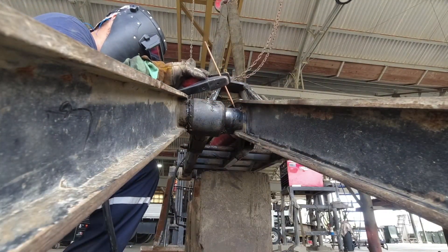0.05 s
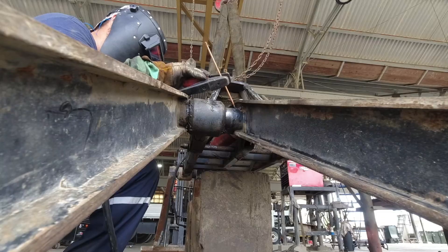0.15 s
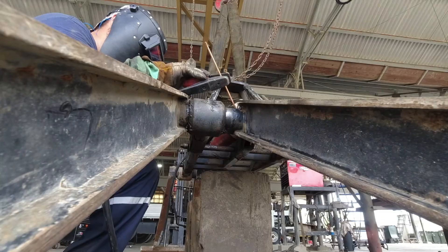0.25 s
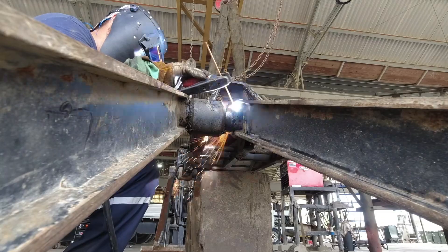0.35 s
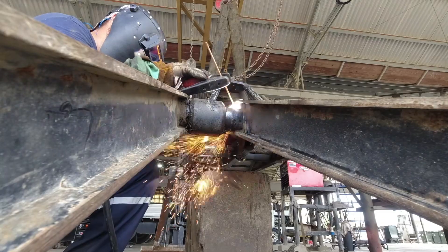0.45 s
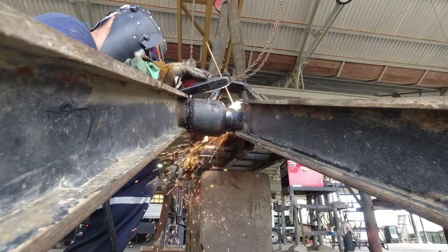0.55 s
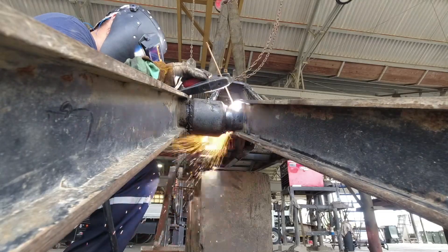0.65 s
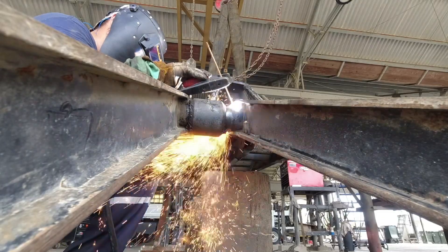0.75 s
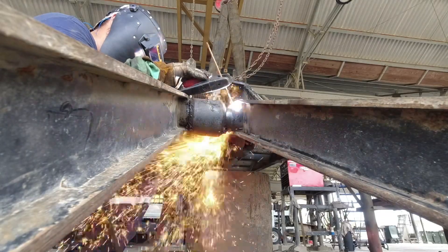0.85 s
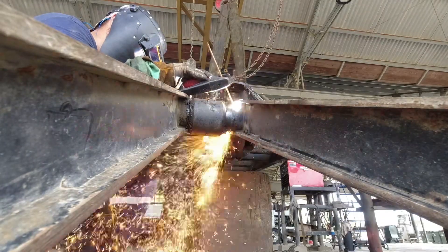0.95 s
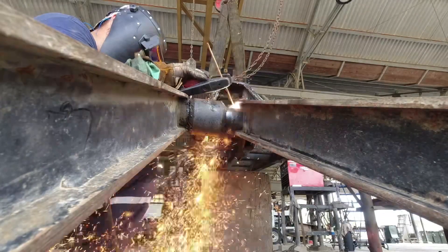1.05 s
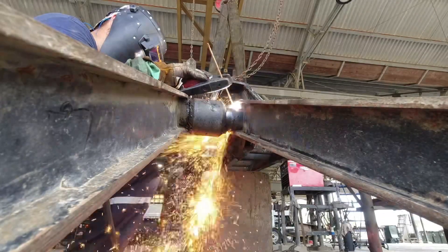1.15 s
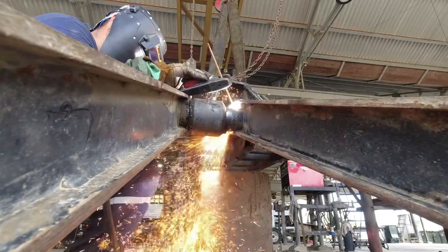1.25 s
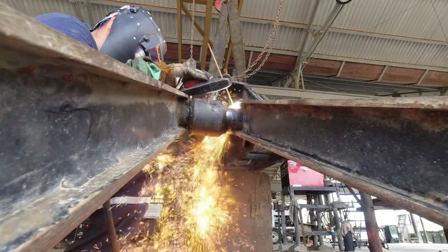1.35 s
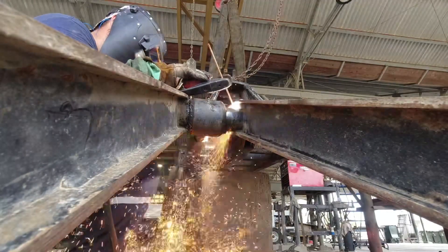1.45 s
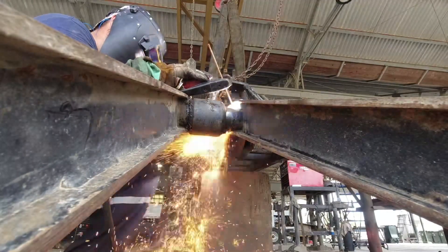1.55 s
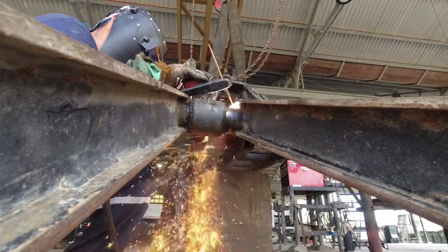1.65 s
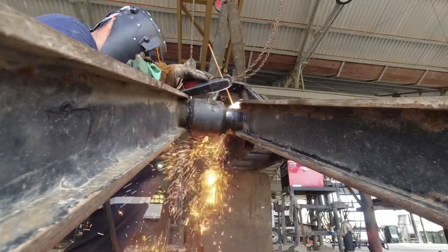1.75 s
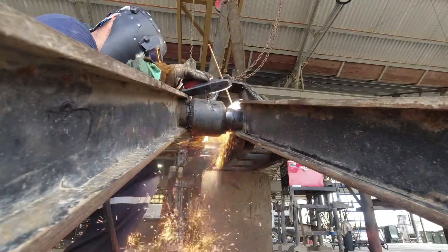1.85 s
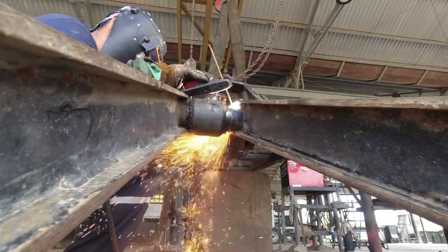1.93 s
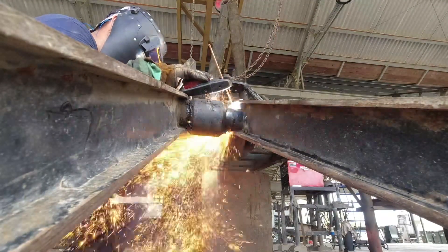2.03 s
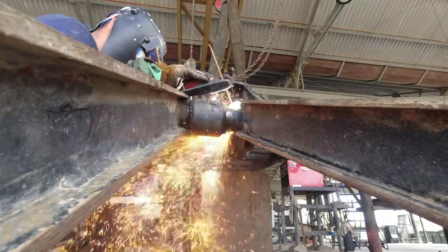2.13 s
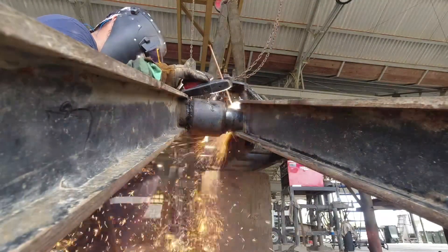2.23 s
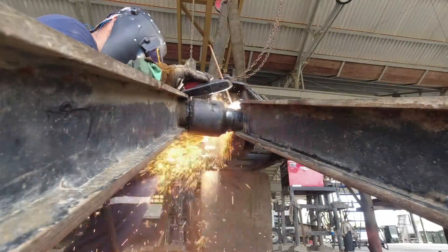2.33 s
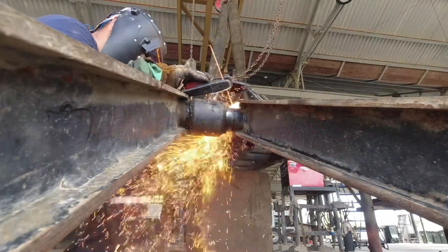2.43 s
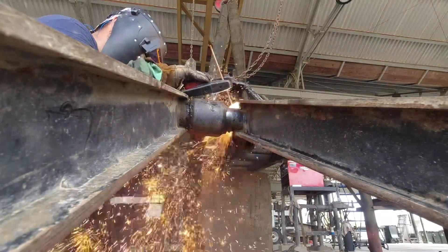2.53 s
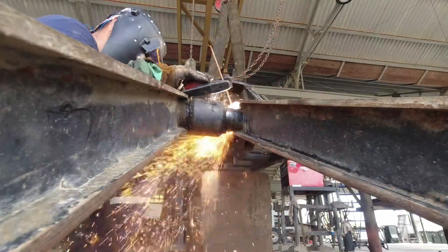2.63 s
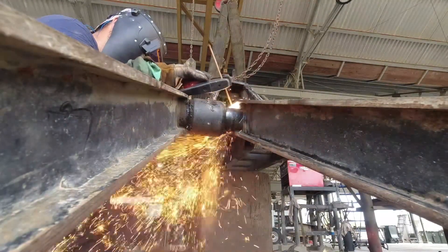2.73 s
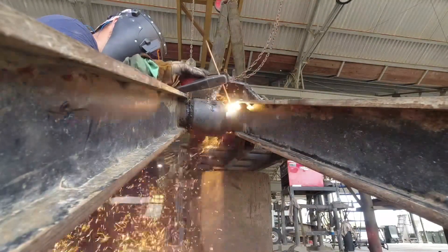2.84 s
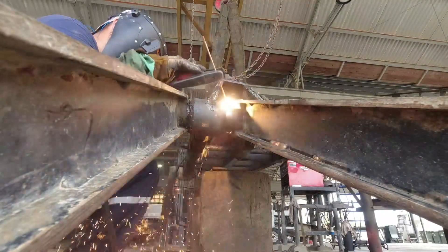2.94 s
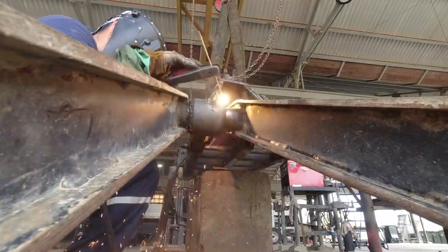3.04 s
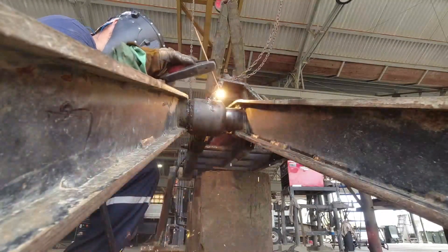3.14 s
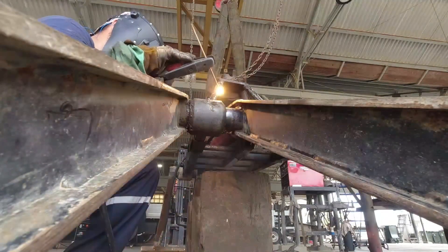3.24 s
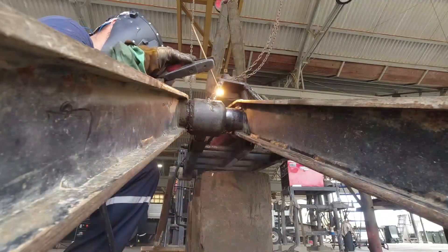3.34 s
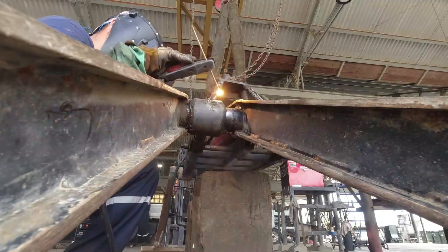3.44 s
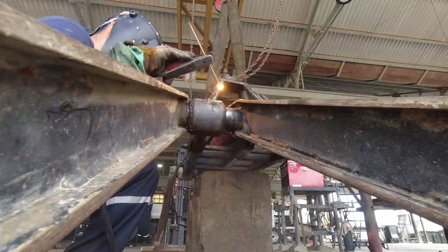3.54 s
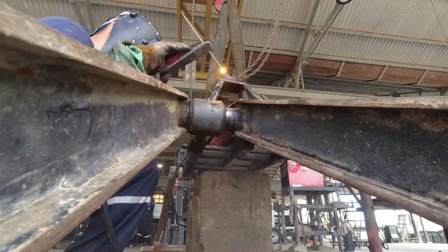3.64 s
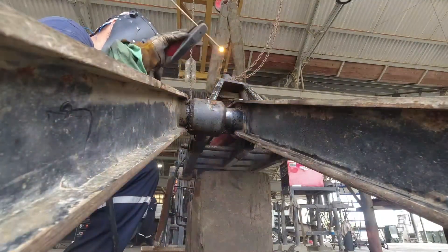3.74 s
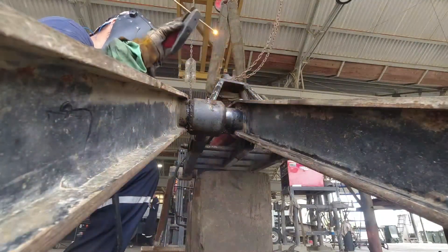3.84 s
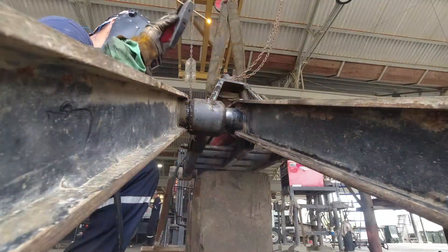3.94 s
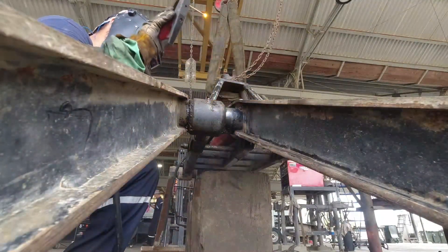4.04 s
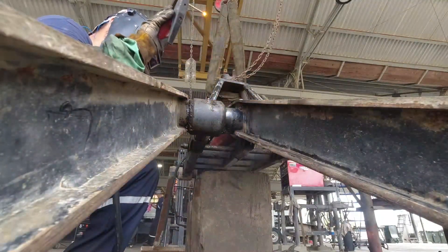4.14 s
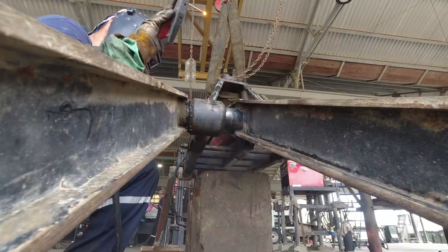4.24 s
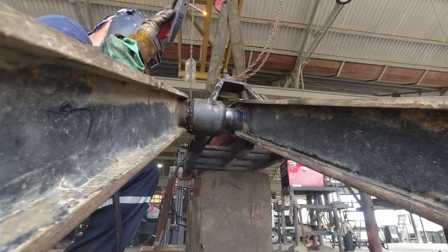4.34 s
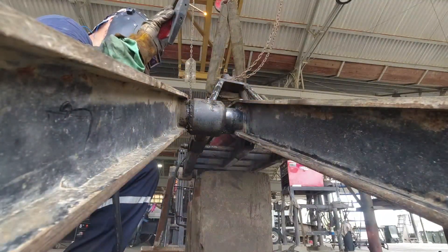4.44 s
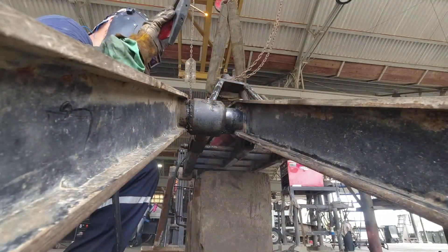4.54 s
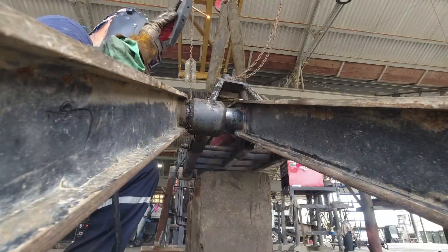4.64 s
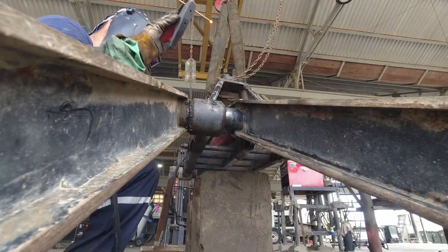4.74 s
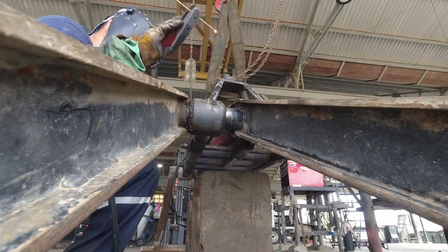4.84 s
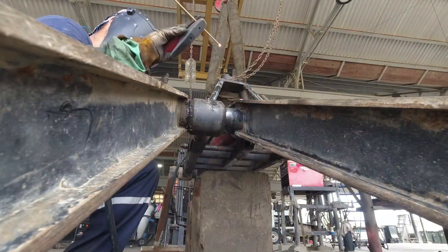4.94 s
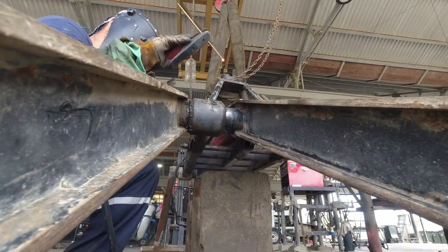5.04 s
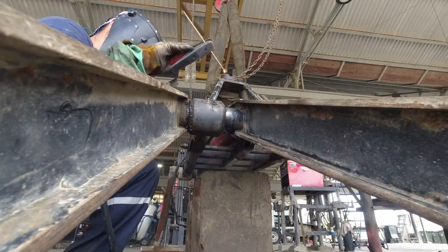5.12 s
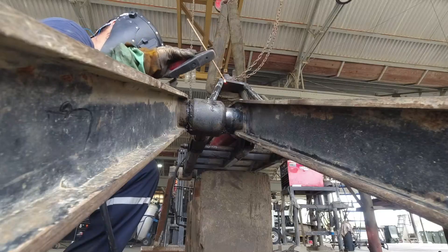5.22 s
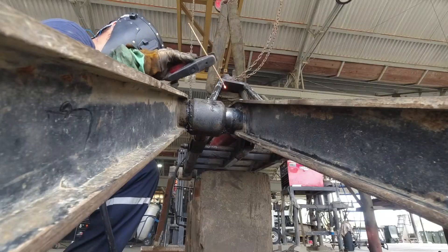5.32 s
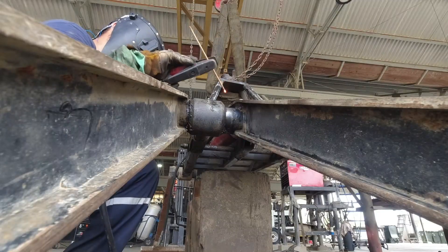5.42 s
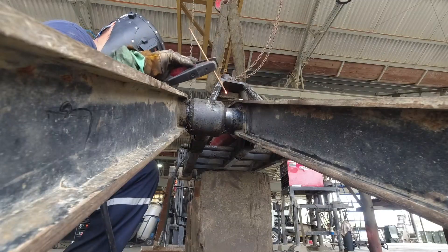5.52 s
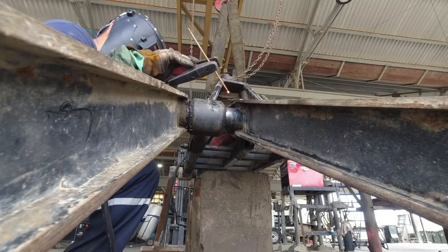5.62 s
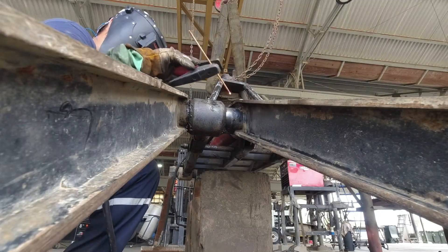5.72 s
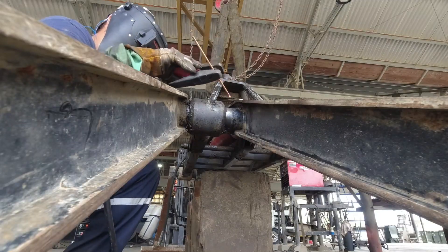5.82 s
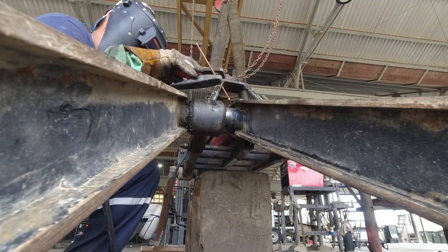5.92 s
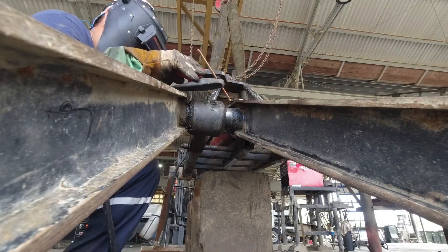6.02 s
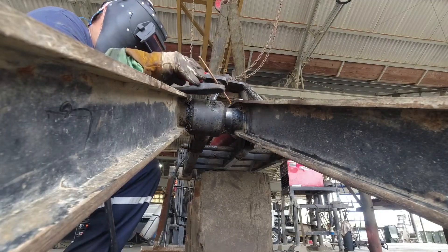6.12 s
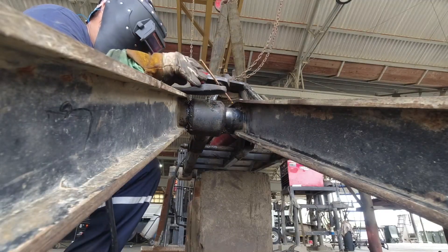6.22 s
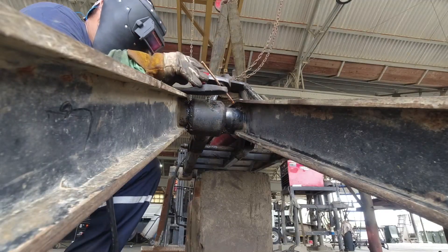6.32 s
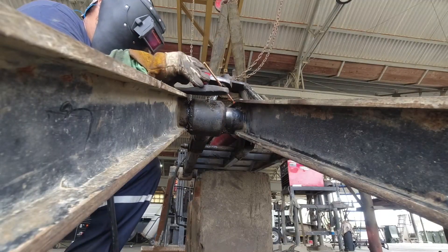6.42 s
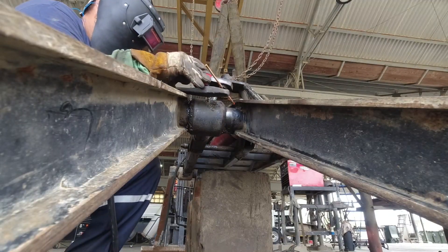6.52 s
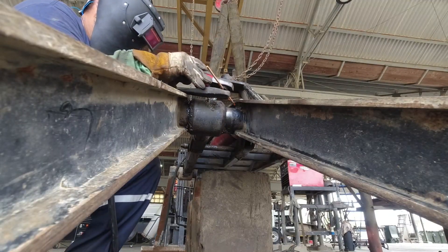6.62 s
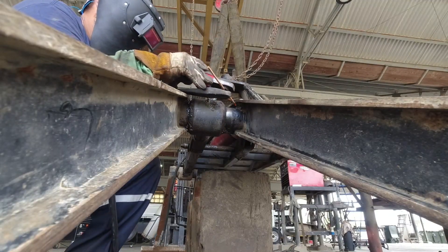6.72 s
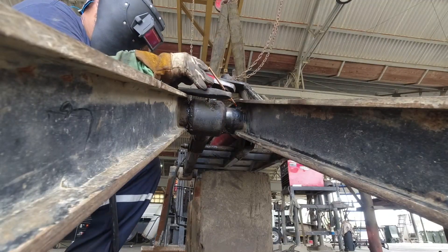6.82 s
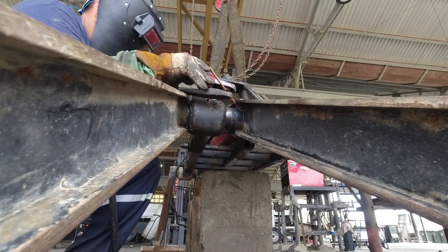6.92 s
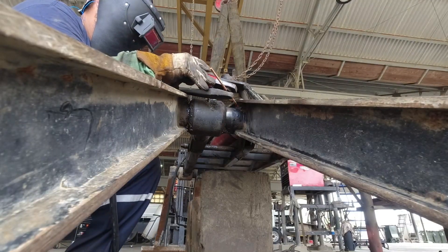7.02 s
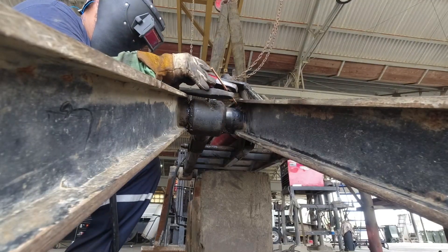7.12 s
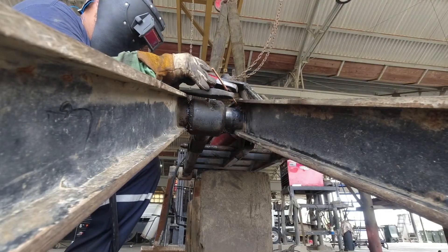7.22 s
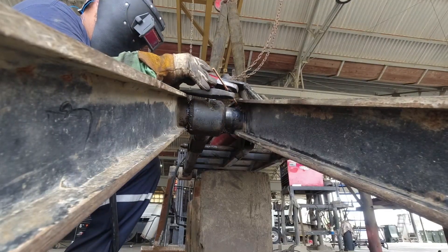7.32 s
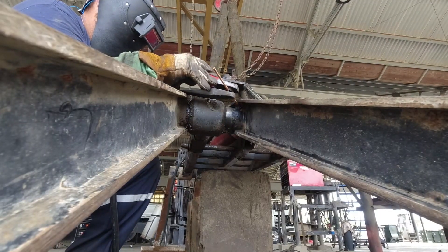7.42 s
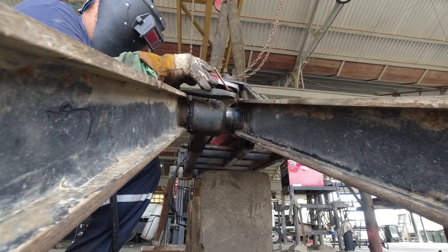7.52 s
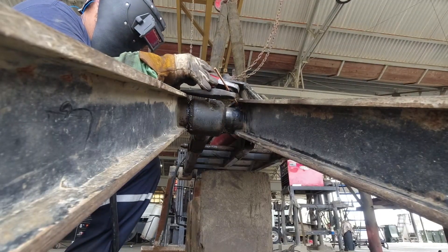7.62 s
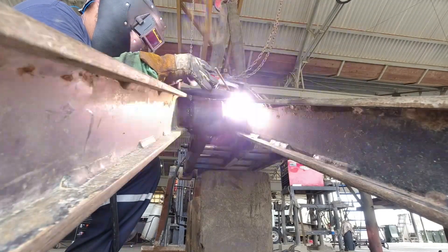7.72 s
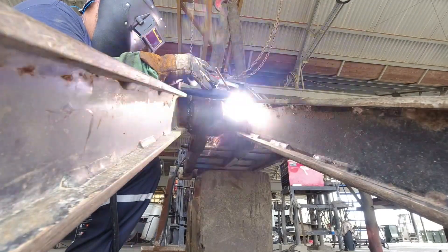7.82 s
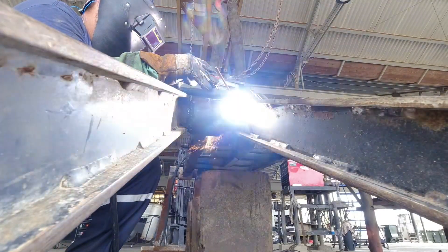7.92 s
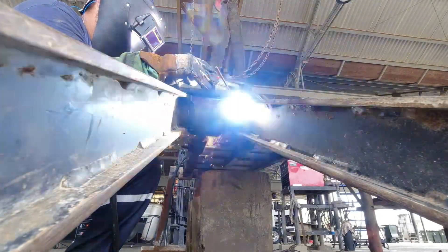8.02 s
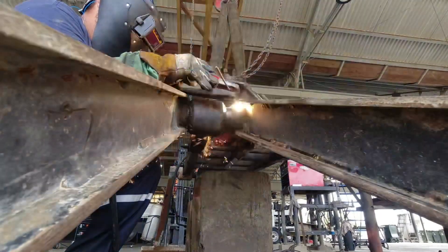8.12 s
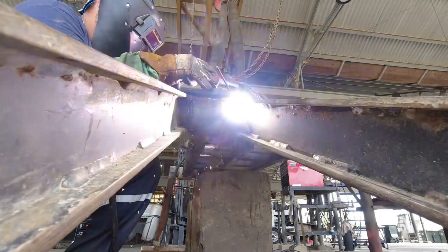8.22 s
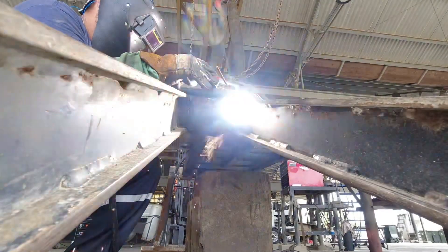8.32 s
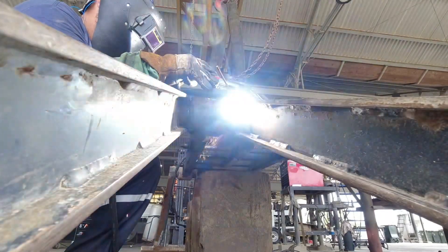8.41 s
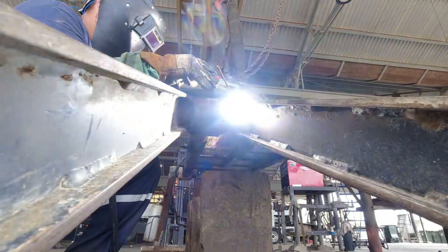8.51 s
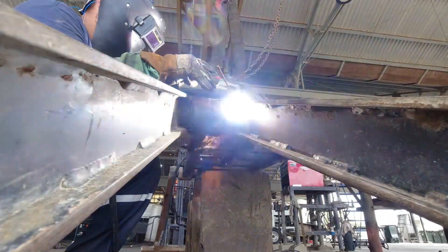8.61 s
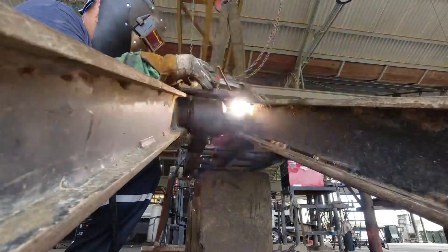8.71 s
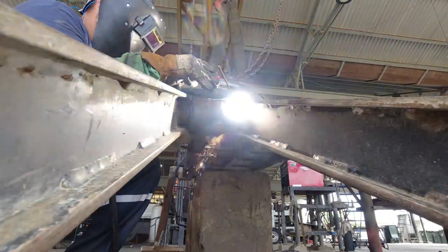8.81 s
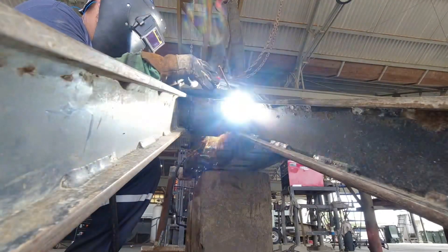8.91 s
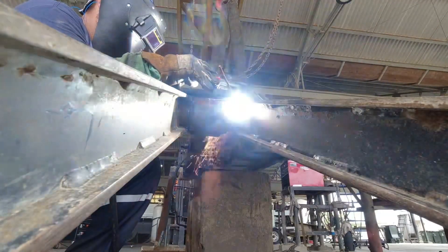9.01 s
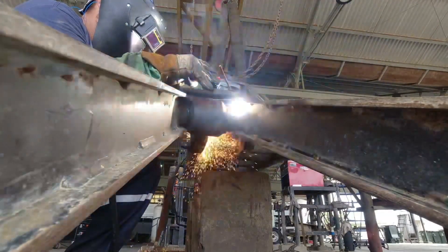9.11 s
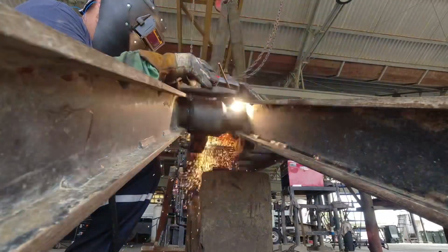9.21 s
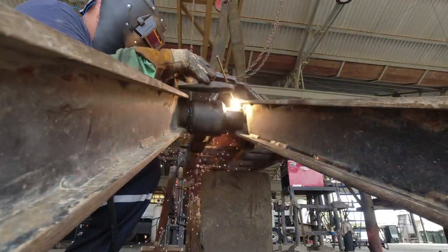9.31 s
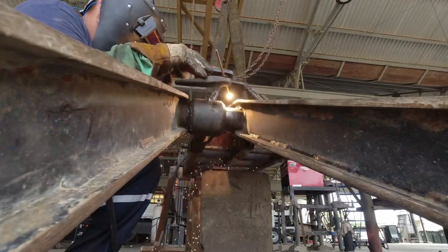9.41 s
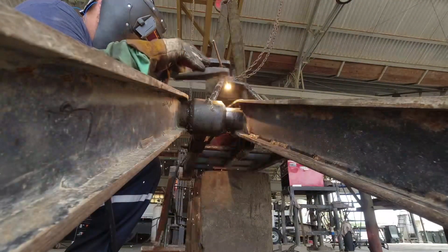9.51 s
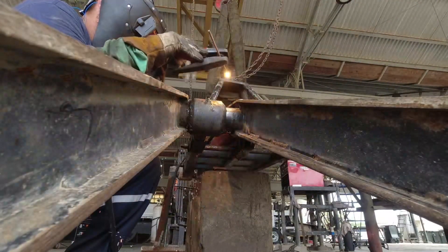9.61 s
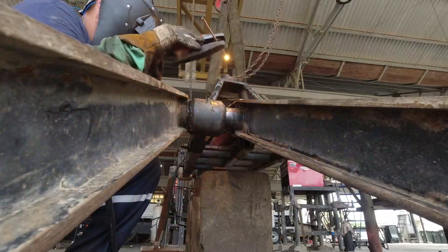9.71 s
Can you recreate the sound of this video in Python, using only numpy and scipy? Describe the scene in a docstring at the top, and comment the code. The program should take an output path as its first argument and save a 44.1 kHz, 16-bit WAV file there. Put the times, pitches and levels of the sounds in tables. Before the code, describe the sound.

Whistling air roars over a steel joint, an arc sizzles and spurts molten metal, the torch lifts to soft hissing, then a louder second cut.

```python
"""A whistling roar of compressed air on steel opens the scene; a carbon arc then gouges a joint in a workshop.
There are two cuts, with the torch lifted in between. Filtered noise makes the air: it hisses throughout,
and on the steel it roars and rings the hollow of the groove. Bursts of noise and random pops make the
sizzling arc, the spurting metal and single sharp cracks. Narrow noise bands whistle as the jet meets edges;
a far drone, thumps of air and a decaying noise tail complete the hall."""
import sys
import numpy as np
from scipy import signal
from scipy.fft import rfft, irfft
from scipy.io import wavfile

SR = 44100
rng = np.random.default_rng(int(sys.argv[2]) if len(sys.argv) > 2 else 0)


def digitize_waveform(pressure):
    """Quantize a signal to 16-bit integers and store it at the path in sys.argv[1].

    Rows of a 2-D input are taken as channels; values are limited to [-1, 1].
    """
    field = np.atleast_2d(pressure).T
    bounded = np.clip(field, -1, 1)
    quanta = np.round(bounded * 32767).astype(np.int16)
    wavfile.write(sys.argv[1], SR, quanta)


N = 430416
TIME = np.arange(N) / SR
# STFT grid: bin frequencies/Hz (column) and frame times/s
FREQ = np.maximum(np.fft.rfftfreq(1024, 1 / SR), 1)[:, None]
MOMENTS = np.arange(-(-N // 512) + 1) * 512 / SR


def undb(db):
    """Decibels to amplitude gain."""
    return 10 ** (np.asarray(db) / 20)


def unit(x):
    """Scale to rms 1."""
    return x / np.sqrt(np.mean(x ** 2))


def across(points):
    """Interpolate (f/Hz, value) points over FREQ on a log-frequency axis."""
    hz, value = np.transpose(points)
    return np.interp(np.log(FREQ), np.log(hz), value)


def over_time(points, t=TIME):
    """Interpolate (t/s, value) points."""
    return np.interp(t, *np.transpose(points))


def walk(rate_hz, t=TIME):
    """Random line of rms near 1, joining new normal draws rate_hz times a second."""
    steps = rng.standard_normal(4096)
    return np.sqrt(3 / 2) * np.interp(t * rate_hz, np.arange(len(steps)), steps)


def envelope(start_s, length_s, attack_s, release_s):
    """Linear rise, hold to the end of length_s, exponential decay."""
    t = TIME - start_s
    return np.clip(t / attack_s, 0, 1) * np.exp(-np.maximum(t - length_s, 0) / release_s)


TREMBLE_PER_S, TREMBLE_HZ = 28, 22


def resonances(modes, waver_db, widen_hz=0, bend=1):
    """Sum of resonance gains over frequency and time; each trembles at random in pitch and strength."""
    gain = 0
    for hz, width_hz, db in modes:
        centre_hz = hz * bend + TREMBLE_HZ * walk(TREMBLE_PER_S, MOMENTS)
        strength = undb(db + waver_db * walk(TREMBLE_PER_S, MOMENTS))
        gain = gain + strength / (1 + (2 * (FREQ - centre_hz) / (width_hz + widen_hz)) ** 2)
    return gain


def turbulence():
    """Two independent noise streams for the eddies."""
    return rng.standard_normal((2, N))


def crackle(per_s, share):
    """Tiny bursts of arc and droplets at random moments; share is their part of the power, eddies the rest."""
    pops = (rng.random(N) < per_s / SR) * rng.standard_normal((2, N))
    return np.sqrt(share) * unit(pops) + np.sqrt(1 - share) * turbulence()


def radiate(drive, gain, likeness):
    """Colour two drives at constant power, spread as mid and side by ear correlation; mid has rms 1."""
    likeness = np.clip(likeness + 0 * FREQ, -.98, .98)
    colour = gain / np.sqrt(np.sum(gain ** 2, axis=0))
    colour = colour * np.sqrt([1 + likeness, 1 - likeness])
    spectra = signal.stft(drive, nperseg=1024)[2]
    mid, side = signal.istft(spectra * colour)[1][:, :N]
    return np.array([mid + side, mid - side]) / np.std(mid)


HUM_HZ, HUM_DB = 115, -58.5


def hum(wander_hz=4, waver_db=3):
    """Far machinery drones: one sine, random in pitch and level."""
    phase = 2 * np.pi * np.cumsum(HUM_HZ + wander_hz * walk(30)) / SR
    return undb(HUM_DB) * unit(np.sin(phase) * undb(waver_db * walk(29)))


HALL_T60_S, HALL_TREBLE_T60_S, HALL_SPLIT_HZ, HALL_DB = 1.1, 0.65, 1100, -8


def hall(x):
    """Steel roof and walls return a diffuse noise tail, different at each ear; the treble dies first."""
    t = TIME[:2 * SR]
    noise = rng.standard_normal((2, len(t)))
    lowpass = signal.butter(3, HALL_SPLIT_HZ, fs=SR, output="sos")
    low = signal.sosfiltfilt(lowpass, noise)
    tail = low * undb(-60 * t / HALL_T60_S) + (noise - low) * undb(-60 * t / HALL_TREBLE_T60_S)
    tail = tail * (t > .012)  # delay before the first return
    tail /= np.sqrt(np.sum(tail ** 2, axis=1, keepdims=True))
    return undb(HALL_DB) * signal.fftconvolve(x, tail, axes=1)[:, :N]


# stray puffs of air on the microphone: (t/s, level/dB)
PUFFS = [(7.935, -22.5), (7.962, -24), (7.995, -29)]


def puffs(corner_hz=165):
    """Deflected air thumps on the microphone ports: low noise in short swells, unlike left and right."""
    gain = FREQ / (FREQ + 20) / (1 + (FREQ / corner_hz) ** 2)
    push = sum(undb(db) * np.exp(-((TIME - s) / .013) ** 2) for s, db in PUFFS)
    return push * radiate(turbulence(), gain, -0.23)


# how hard the jet bears on the steel, less as the torch lifts: (t/s, level/dB)
AIR_ON_STEEL = [(0, -3), (.37, -7.5), (.45, 0), (2.8, -3.5), (3.1, -19.5), (3.66, -21), (3.95, -28.5),
                (4.9, -31), (5.13, -24.5), (5.7, -17.5), (5.82, -14.5), (6.05, -16), (6.3, -13.5),
                (6.36, -6.5), (6.48, -8.5), (6.68, -7), (6.72, -2.5), (7.15, 0), (7.6, 1), (8.3, -3.5),
                (9.345, -1.5), (9.42, -17), (9.76, -29.5)]
# at LIFT_DB the jet starts to miss the steel; LIFT_RANGE_DB lower it blows free and the rush is gone
LIFT_DB, LIFT_RANGE_DB = -20.5, 12.5
RUSH_SLOPE = 0.37  # dB of rush per dB of air


def torch_air():
    """Air pressure sets the groove's ring gain, the rush gain (flatter) and the lift (0-1)."""
    db = over_time(AIR_ON_STEEL)
    lift = np.clip((LIFT_DB - db) / LIFT_RANGE_DB, 0, 1)
    return undb(db), undb(RUSH_SLOPE * db) * (1 - lift), lift


# free jet with the hall behind it: (f/Hz, relative level/dB per Hz)
JET = [(20, -8), (60, 3), (115, -2), (200, 1.5), (400, -2), (800, -2), (2000, 0), (3000, 1.5), (5600, 2.5),
       (6300, -0.5), (7200, -9.5), (10000, -14), (13000, -11.5), (16000, -11.5)]
# ear correlation of the jet, 1 alike, -1 opposed: (f/Hz, correlation)
JET_LIKENESS = [(100, 0.81), (550, 0.53), (1050, 0.76), (1550, 0.2), (2100, 0.2), (2480, 0.25),
                (2700, 0.29), (3100, .3), (3900, 0.04), (6000, 0.15), (8000, -0.065)]
# jet resonances at full lift: (f/Hz, width/Hz, level over jet/dB)
NOZZLE = [(1060, 150, 0), (1720, 190, -3), (2640, 170, -4), (3060, 200, -5), (3490, 260, -9),
          (4280, 160, -2), (4480, 180, 0.5), (5370, 220, 0.5), (6150, 200, -4)]
# resonances of the wide gap, torch near the steel: (f/Hz, width/Hz, level over jet/dB)
WIDE_GAP = [(290, 140, 2), (2130, 240, 1), (3060, 220, -3), (3640, 170, -9), (5000, 260, -9)]
# shielding of the free jet by the steel: (t/s, level/dB)
JET_SHIELDING = [(0, -3.5), (2.6, -1), (3.1, 2), (4.3, 1), (5.2, 2), (6.3, 0.8), (9.3, -1.5), (9.76, 4)]
JET_DB = -38.5
WIDE_GAP_RANGE_DB = 3.5  # 1/e distance of air level from LIFT_DB


def free_jet(lift, waver_db=0.3):
    """Steady jet noise rings the wide gap near the steel, and the nozzle when lifted clear."""
    air_db = over_time(AIR_ON_STEEL, MOMENTS)
    near = np.exp(-((air_db - LIFT_DB) / WIDE_GAP_RANGE_DB) ** 2)
    nozzle = np.interp(MOMENTS, TIME, lift) * resonances(NOZZLE, waver_db=1.2)
    gap = near * resonances(WIDE_GAP, waver_db=1.2)
    gain = undb(across(JET)) * (1 + nozzle + gap)
    db = JET_DB + over_time(JET_SHIELDING) + waver_db * walk(15)
    return radiate(turbulence(), gain, across(JET_LIKENESS)) * undb(db)


# edge tones of the jet: (t/s, length/s, f/Hz, glide/Hz, width/Hz, level/dB)
WHISTLES = [(0, 0.35, 1940, 2, 160, -31), (0, 0.26, 2750, 3, 150, -34.5), (0, 0.32, 3620, 3, 110, -39.5),
            (0.39, 0.059, 2160, -60, 120, -25), (0.477, 0.48, 2085, 59.5, 94, -29),
            (0.38, 0.066, 5230, 113, 109, -34.5), (1.344, 0.062, 2100, -350, 170, -38),
            (1.569, 0.043, 5300, 0, 80, -32.5), (2.038, 0.17, 3680, -1, 125, -27.5),
            (2.064, 0.11, 5360, 90, 100, -31), (2.343, 0.1, 5380, -6, 80, -38),
            (2.393, 0.06, 1940, -230, 120, -25.5), (2.717, 0.029, 1040, -52, 89, -27),
            (2.83, 0.32, 3130, -1.5, 120, -42), (4.87, 0.51, 1080, -0.5, 100, -51),
            (4.88, .2, 3080, 0, 110, -51), (4.964, .3, 3630, 58, 110, -50), (5.1, .65, 2120, -40, 130, -46),
            (5.77, .14, 2050, 0, 150, -38), (5.57, 0.25, 13880, 0, 70, -48), (5.71, .14, 13690, 0, 70, -48),
            (5.832, 0.069, 11000, 0, 60, -42), (5.83, 0.089, 10740, 0, 60, -46),
            (5.96, .18, 10660, 0, 40, -56), (6.18, 0.05, 10680, 0, 60, -43),
            (6.173, 0.081, 11180, 0, 50, -43), (6.195, .08, 13830, 0, 80, -46),
            (6.28, .21, 13940, 60, 60, -48), (7.87, 0.058, 3600, -3, 110, -27),
            (7.954, .13, 3530, 0, 90, -30), (8.33, 0.43, 3610, 0.5, 91.5, -29.5),
            (8.955, 0.19, 3560, 3, 80, -26)]
WHISTLE_ATTACK_S, WHISTLE_RELEASE_S = 0.018, 0.024
FLARES_PER_S, FLARE_DB = 24, 4.5


def whistles():
    """The jet catches an edge of the joint: narrow noise bands flare unevenly and slide as the edge shifts."""
    out, freq = np.zeros(N), np.fft.rfftfreq(SR, 1 / SR)
    for s, length_s, hz, glide_hz, width_hz, db in WHISTLES:
        # eddies feed a narrow band only, so the tone wavers in strength and pitch
        passband = np.exp(-((freq - hz) / width_hz) ** 2)
        narrow = irfft(rfft(rng.standard_normal(SR)) * passband)
        band = np.resize(signal.hilbert(narrow), N)
        slide_hz = glide_hz * np.clip((TIME - s) / length_s, 0, 1)
        slide = 2 * np.pi * np.cumsum(slide_hz) / SR
        tone = np.real(band * np.exp(1j * slide)) * undb(FLARE_DB * walk(FLARES_PER_S))
        shape = envelope(s, length_s, WHISTLE_ATTACK_S, WHISTLE_RELEASE_S)
        out += undb(db) * shape * tone / np.sqrt(np.average(tone ** 2, weights=shape ** 2))
    return out


# hollows between the flanges: (f/Hz, width/Hz, level/dB)
FLANGES = [(310, 200, -8), (930, 330, 3), (1350, 240, 4.5), (1920, 330, 2)]
# torch hovers, its air fans out over the flanges: (t/s, length/s, level/dB)
HOVERS = [(2.7, 0.94, -36.5), (5.296, 0.31, -32), (5.65, 0.65, -32), (6.234, 1, -29.5), (9.1, 0.29, -32.5)]
# ear correlation of sound from the steel, 1 alike, -1 opposed: (f/Hz, correlation)
STEEL_LIKENESS = [(40, -0.021), (600, 0.18), (1000, 0.65), (1200, 0.38), (1420, 0.7), (1580, 0.25),
                  (1900, 0.82), (2300, 1), (2550, 0.27), (2800, 0.12), (3100, -0.41), (3520, -0.12),
                  (3850, -0.57), (4300, -0.091), (4750, -0.29), (5350, 0.55), (5850, -0.46), (6450, 0.5),
                  (8000, -1.2)]
HOVER_ATTACK_S, HOVER_RELEASE_S = 0.18, 0.16


def wash(rush):
    """Air spreading over the steel excites the flange hollows: a hollow rush while the torch hovers."""
    gain = resonances(FLANGES, waver_db=1.5)
    hover = sum(undb(db) * envelope(s, length_s, HOVER_ATTACK_S, HOVER_RELEASE_S)
                for s, length_s, db in HOVERS)
    return radiate(turbulence(), gain, across(STEEL_LIKENESS)) * rush * hover


# single cracks of the arc: (t/s, level/dB, f/Hz)
SPITS = [(0.538, -14, 2080), (0.578, -15, 2300), (0.711, -20, 2200), (1.342, -17, 2060), (2.008, -23, 2580),
         (2.418, -24, 2000), (7.627, -20, 1400), (7.791, -21, 2200), (7.883, -20, 2900), (8.166, -11, 2160),
         (8.177, -16, 2180)]
SPIT_RISE_S, SPIT_DECAY_S, SPIT_OCTAVES = 0.0006, 0.0026, 0.67


def spits():
    """A droplet shorts the arc and bursts: a band of noise lasting a few milliseconds."""
    out, freq = np.zeros(N), np.maximum(np.fft.rfftfreq(SR, 1 / SR), 1)
    for s, db, hz in SPITS:
        passband = np.exp(-(np.log2(freq / hz) / SPIT_OCTAVES) ** 2)
        burst = irfft(rfft(rng.standard_normal(SR)) * passband)
        shape = envelope(s, SPIT_RISE_S, SPIT_RISE_S, SPIT_DECAY_S)
        out += undb(db) * shape * np.resize(unit(burst), N)
    return out


# molten metal blown out of the groove: (t/s, length/s, strength/dB, extra spatter/dB)
SPURTS = [(1.03, 0.037, 1.5, -7), (1.182, 0.12, -4.5, -3), (1.326, 0.066, 4, -10), (1.49, 0.13, -4, 0.5),
          (1.593, 0.093, 3, 0), (1.737, 0.044, 2.5, 0.5), (1.862, 0.14, -4.5, 5), (2.002, 0.15, 2, 2),
          (2.16, 0.051, 3, -1), (2.26, 0.13, -1.5, 2.5), (2.347, 0.13, 2.5, -1), (2.643, 0.06, 0.5, 3),
          (2.696, 0.04, 5.5, -2), (7.1, 0.22, -28, 15), (7.403, 0.05, -15, 8), (7.47, 0.2, -8, 4),
          (7.737, 0.086, -7, 6), (7.987, 0.069, -3, 4.5), (8.1, 0.23, -4.5, -2.5),
          (8.302, 0.094, -13.5, 14.5), (8.57, 0.069, -2, 2), (9.032, 0.15, -0.5, 1), (9.167, 0.1, -8, 3)]
SPURT_ATTACK_S, SPURT_RELEASE_S = 0.03, 0.021
SAG_PER_S, SMEAR_HZ = 1, 90  # at strength 0 dB and above: share of pitch lost per second, added width


def groove_shape():
    """A spurt hollows out the groove: its resonances fall by a pitch factor and widen by some Hz."""
    sag, smear_hz = 0, 0
    for s, length_s, db, _ in SPURTS:
        blown = min(undb(db), 1) * envelope(s, length_s, SPURT_ATTACK_S, SPURT_RELEASE_S)
        sag = sag + blown * SAG_PER_S * (TIME - s - length_s / 2)
        smear_hz = smear_hz + blown * SMEAR_HZ
    return np.interp(MOMENTS, TIME, 1 - sag), np.interp(MOMENTS, TIME, smear_hz)


# steady burning of the arc: (t/s, length/s, strength/dB)
BURNS = [(0.352, 0.18, -4), (0.56, 0.41, -3), (1.15, 2, -17.5), (7.81, 0.091, -1), (7.933, 0.11, 1),
         (8.349, 0.32, 0), (8.768, 0.22, -3), (8.92, 0.2, -2.5)]
# what a burn sounds of: (roar/dB, groove/dB, spatter/dB, sizzle/dB)
BURN_MIX_DB = (-25.5, -25, -26, -29.5)
# what a spurt sounds of: (roar/dB, groove/dB, spatter/dB, sizzle/dB)
SPURT_MIX_DB = (-30.5, -24.5, -27, -51)
BURN_ATTACK_S, BURN_RELEASE_S = 0.065, 0.11
SPURT_RUSH_SLOPE = 0.53  # dB of roar and sizzle per dB of spurt


def gouging_power():
    """Power that burns and spurts give to roar, groove, spatter and sizzle."""
    burning = sum((undb(db) * envelope(s, length_s, BURN_ATTACK_S, BURN_RELEASE_S)) ** 2
                  for s, length_s, db in BURNS)
    blown, droplets = 0, 0
    for s, length_s, db, spatter_db in SPURTS:
        spurt = (undb(db) * envelope(s, length_s, SPURT_ATTACK_S, SPURT_RELEASE_S)) ** 2
        blown = blown + spurt
        droplets = droplets + spurt * undb(spatter_db) ** 2
    rush = blown ** SPURT_RUSH_SLOPE
    spurting = (rush, blown, droplets, rush)
    return [undb(burn_db) ** 2 * burning + undb(spurt_db) ** 2 * spurt
            for burn_db, spurt_db, spurt in zip(BURN_MIX_DB, SPURT_MIX_DB, spurting)]


# turbulence on the steel: (f/Hz, relative level/dB per Hz)
ROAR = [(20, 0), (50, -2), (120, -1.5), (300, 0), (700, -0.5), (1100, -3), (1600, -1.5), (2500, -3),
        (4500, -5.5), (6000, -33), (8000, -68)]
# air skimming the steel: (f/Hz, relative level/dB per Hz)
HISS = [(1500, -23), (2480, -6), (2700, 4), (3000, 0.5), (3600, 0.5), (4500, -6), (5400, -5), (6300, -19.5),
        (8000, -60)]
SEALED_DB, WIDEN_HZ_PER_DB = -9, 10  # below this air level the gap leaks and its resonances widen


def cut(ring, rush, gouging, groove, spatter, arc, roar_db, groove_db, hiss_db, waver_db,
        flutter_hz, flutter_db, pops_per_s, pop_share):
    """Air roars, hisses and rings the groove; gouging swells roar and ring, adds spatter and sizzle."""
    likeness = across(STEEL_LIKENESS)
    # the melt pool wobbles in the jet and shakes every part together
    flutter = undb(flutter_db * walk(flutter_hz))
    sparks = crackle(pops_per_s, pop_share)
    leak_hz = WIDEN_HZ_PER_DB * np.maximum(SEALED_DB - over_time(AIR_ON_STEEL, MOMENTS), 0)
    bend, smear_hz = groove_shape()
    groove_gain = resonances(groove, waver_db, leak_hz + smear_hz, bend)
    roaring, ringing, spattering, sizzling = gouging
    # (drive, colour, power)
    parts = [
        (turbulence(), undb(across(ROAR)), (undb(roar_db) * rush) ** 2 + roaring),
        (turbulence(), undb(across(HISS)), (undb(hiss_db) * rush) ** 2),
        (crackle(pops_per_s, pop_share), groove_gain, (undb(groove_db) * ring) ** 2 + ringing),
        (sparks, resonances(spatter, waver_db), spattering),
        (sparks, resonances(arc, waver_db), sizzling),
    ]
    mix = sum(radiate(drive, gain, likeness) * np.sqrt(power) for drive, gain, power in parts)
    return unit(flutter) * mix


# gap between torch and steel, first cut: (f/Hz, width/Hz, level/dB)
FIRST_GROOVE = [(984, 110, -10.5), (1140, 130, -7), (1440, 410, -12.5), (1725, 135, -1), (1920, 140, -5),
                (2150, 160, 6.5), (2350, 140, -1.5)]
# same gap, excited by spatter: (f/Hz, width/Hz, level/dB)
FIRST_SPATTER = [(2670, 670, 0.5), (3330, 200, -8), (3670, 140, 0.5)]
# same gap, excited by the arc: (f/Hz, width/Hz, level/dB)
FIRST_ARC = [(4100, 200, -1), (4430, 160, 4), (5050, 220, 0), (5420, 220, 3.5), (6190, 150, -3),
             (6510, 73, -11.5)]


def first_cut(ring, rush, gouging):
    """First gap: a quieter ring and a larger share of pops."""
    return cut(ring, rush, gouging, FIRST_GROOVE, FIRST_SPATTER, FIRST_ARC,
               roar_db=-34.5, groove_db=-25.5, hiss_db=-34.0, waver_db=3.5,
               flutter_hz=95.0, flutter_db=0.68, pops_per_s=3000, pop_share=0.32)


# gap between torch and steel, second cut: (f/Hz, width/Hz, level/dB)
SECOND_GROOVE = [(996, 200, -9.5), (1390, 210, -5.5), (1763, 170, -3), (1930, 170, -2), (2100, 160, -2.5),
                 (2270, 190, 4)]
# same gap, excited by spatter: (f/Hz, width/Hz, level/dB)
SECOND_SPATTER = [(2650, 370, 2), (3250, 250, -11.5), (3620, 460, 1), (4180, 150, -7)]
# same gap, excited by the arc: (f/Hz, width/Hz, level/dB)
SECOND_ARC = [(4170, 360, -5), (4500, 230, -1), (4920, 270, -6), (5220, 180, 4), (5600, 79, 2)]


def second_cut(ring, rush, gouging):
    """Second gap: a louder ring and a faster, deeper flutter."""
    return cut(ring, rush, gouging, SECOND_GROOVE, SECOND_SPATTER, SECOND_ARC,
               roar_db=-33.0, groove_db=-22, hiss_db=-36, waver_db=3.0,
               flutter_hz=129.0, flutter_db=0.93, pops_per_s=3500, pop_share=0.17)


BETWEEN_CUTS_S = 4.4


def scene():
    """Both cuts, the wash and the cracks ring in the hall over jet, whistles, drone and puffs."""
    ring, rush, lift = torch_air()
    gouging = gouging_power()
    first = first_cut(ring, rush, gouging)
    second = second_cut(ring, rush, gouging)
    torch = np.where(TIME < BETWEEN_CUTS_S, first, second) + wash(rush) + spits()
    return torch + hall(torch) + whistles() + free_jet(lift) + hum() + puffs()


TOP_HZ = 15750


def record(dry):
    """The recorder rounds the highest peaks and cuts steeply above TOP_HZ."""
    rounded = dry - .1 * dry ** 5
    lowpass = signal.ellip(10, .2, 80, TOP_HZ, fs=SR, output="sos")
    return signal.sosfilt(lowpass, rounded)


dry = scene()
out = record(dry)
digitize_waveform(out)
```